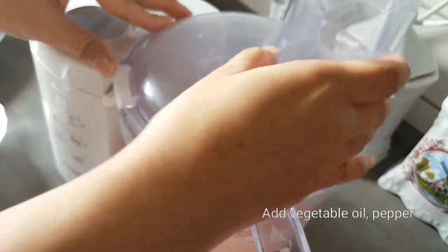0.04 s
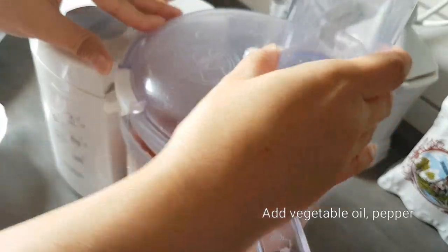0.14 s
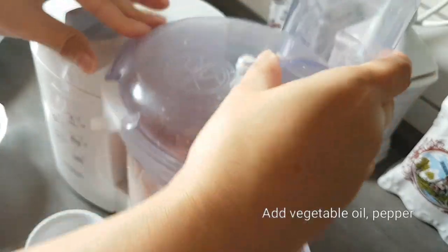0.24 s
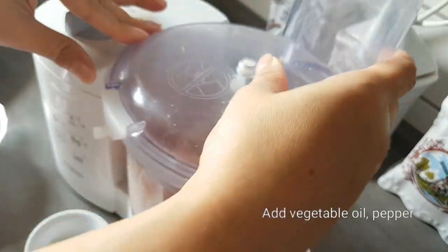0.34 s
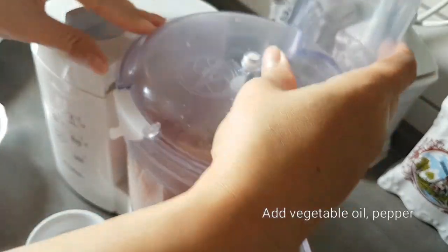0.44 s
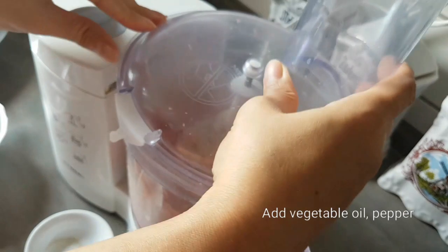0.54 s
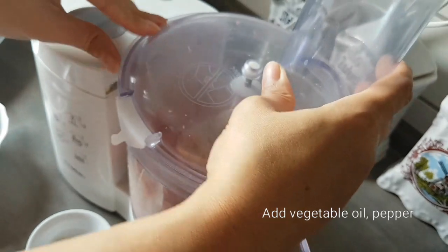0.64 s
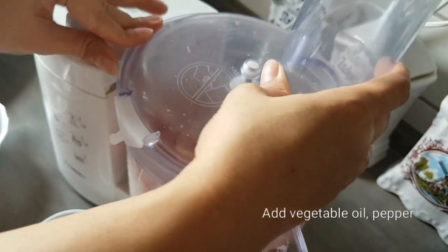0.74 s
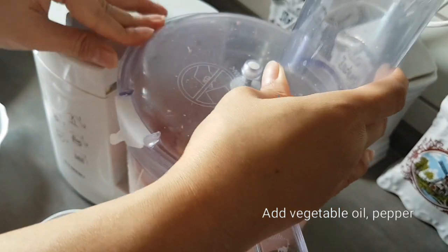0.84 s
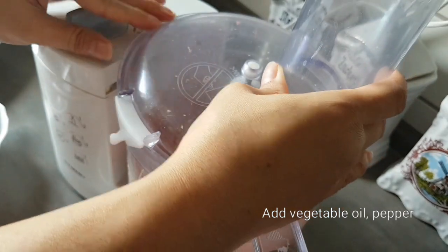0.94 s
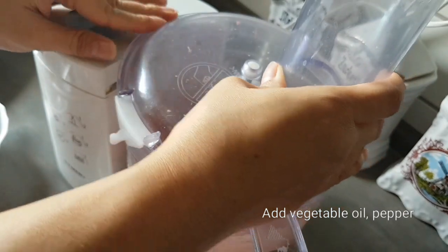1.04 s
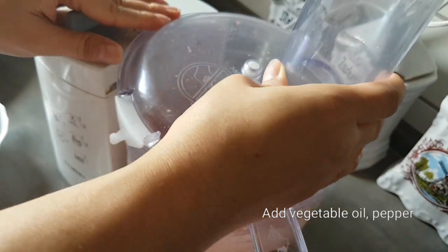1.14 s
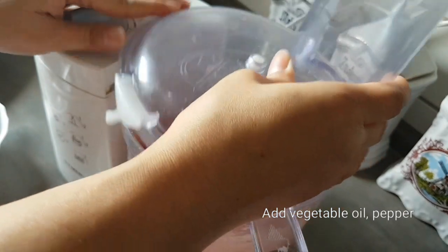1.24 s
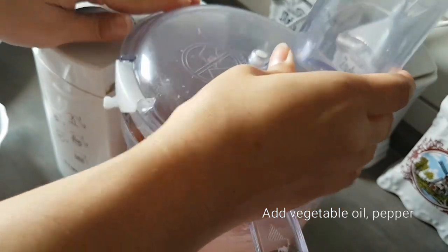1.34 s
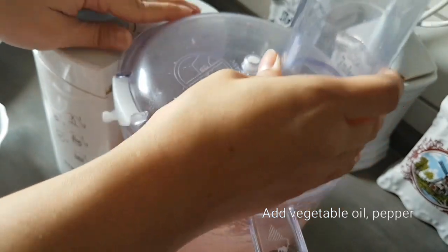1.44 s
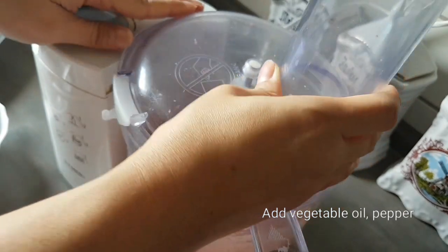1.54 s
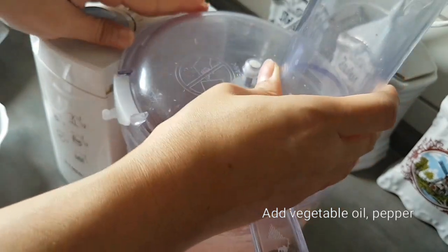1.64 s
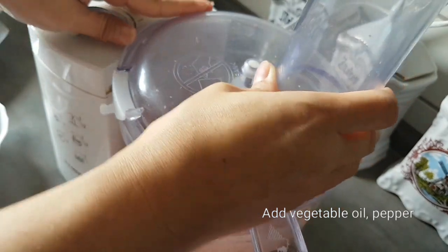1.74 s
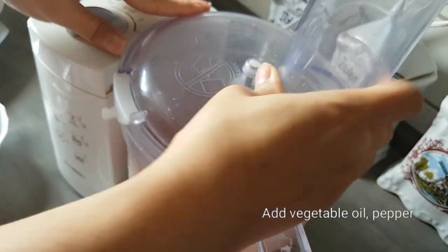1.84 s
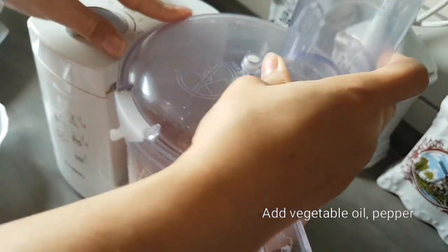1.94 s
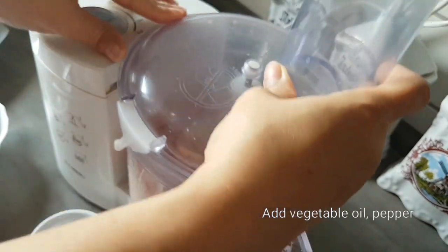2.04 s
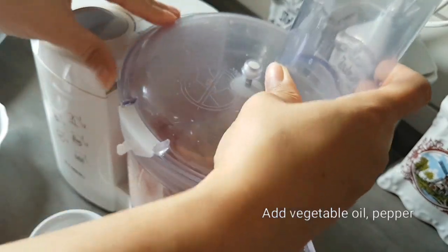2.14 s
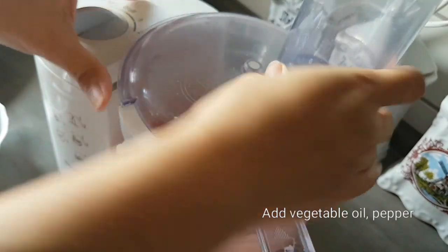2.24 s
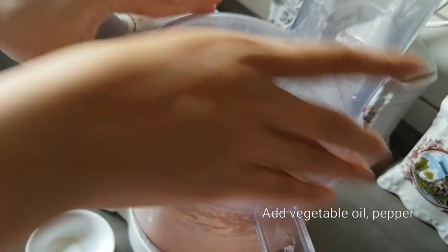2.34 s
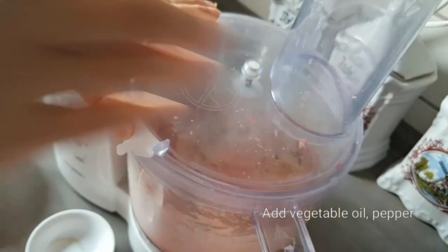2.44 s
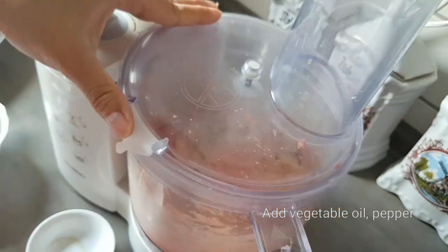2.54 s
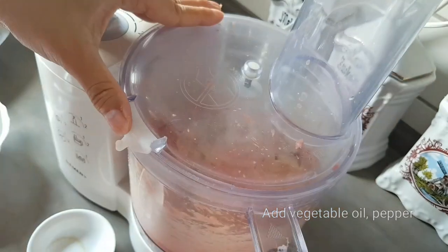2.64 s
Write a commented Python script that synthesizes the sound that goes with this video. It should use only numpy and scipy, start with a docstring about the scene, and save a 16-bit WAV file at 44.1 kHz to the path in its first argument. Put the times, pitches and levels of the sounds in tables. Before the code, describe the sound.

Hollow plastic knocks and short rubs as a lid is seated on a food processor bowl

```python
"""Hands turn and seat a plastic lid on a food processor bowl in a quiet kitchen, close to a stereo microphone pair.
A faint knock, then a sharp one at 0.24 s; lid rim rubs and scattered knocks follow up to 1.3 s.
Hard knocks cluster at 1.5-1.85 s; scrapes, one more firm knock at 2.38 s and faint taps close the scene.
Each knock rings decaying modes of base, bowl and lid and adds a noise tick; rubs are trains of tiny random slips.
Quiet room tone runs throughout, and sparse reflections answer every sound."""
import sys
import numpy as np
from scipy import signal
from scipy.fft import rfft, irfft, next_fast_len
from scipy.io import wavfile
from scipy.ndimage import uniform_filter1d

SR = 44100
rng = np.random.default_rng(int(sys.argv[2]) if len(sys.argv) > 2 else 0)


def dump(signal):
    """Clip the signal to [-1, 1] and save it as 16-bit WAV at the path in sys.argv[1]."""
    limited = np.clip(np.atleast_2d(signal).T, -1, 1)
    pcm = np.round(limited * 32767).astype(np.int16)
    wavfile.write(sys.argv[1], SR, pcm)


N = 119070

# Modes of base, bowl air, dome, rim, latch and tab, one list per part.
# Each row: frequency in Hz, level in dB, t60 in s before any damping by the hand or grip.
PART_MODES = [
    [(74.5, -14.5, 0.72), (99.7, 0.5, 0.29), (150.5, 3.5, 0.13)],
    [(286.2, 1, 0.11)],
    [(401, -7.5, 0.18), (510, -17, 0.15), (555, 0, 0.06), (604, 1, 0.067), (687.3, -2.5, 0.05)],
    [(877, -3, 0.078), (992, -6.5, 0.2), (1044, 0, 0.051)],
    [(1339, 2.5, 0.032), (1819, 0.5, 0.033)],
    [(2006, 7.5, 0.014), (2310, -1.5, 0.023)],
]
# Left-right likeness of reflections and room tone. Each row: frequency in Hz, likeness 0-1.
SIDE_LIKENESS = [(150, .9), (2000, 0.)]


def amp(db):
    """Convert dB to an amplitude factor."""
    return 10 ** (np.asarray(db) / 20)


def evened(x):
    """Scale to an RMS of 1."""
    return x / np.sqrt(np.mean(x ** 2) + 1e-20)


def read(points, hz):
    """Interpolate a (Hz, value) table along log frequency."""
    f, value = np.transpose(points)
    return np.interp(np.log(hz + 1), np.log(f + 1), value)


def colour(points):
    """Minimum-phase filter taps of energy 1 for a spectrum in dB."""
    half = read(points, np.fft.rfftfreq(4096, 1 / SR)) * np.log(10) / 20
    full = np.r_[half, half[-2:0:-1]]
    phase = -signal.hilbert(full).imag
    taps = np.fft.ifft(np.exp(full + 1j * phase)).real[:2048]
    return taps / np.linalg.norm(taps)


def add(mix, start_s, sound):
    """Mix a sound in place at its start time, cut at the end of the mix."""
    part = mix[round(start_s * SR):][:len(sound)]
    part += sound[:len(part)]


def partly_alike(left, other, likeness):
    """Left and right spectra of equal power: the right blends the left with an independent one."""
    return np.array([left, likeness * left + np.sqrt(1 - likeness ** 2) * other])


def air():
    """Quiet room tone: steady coloured noise, its bass alike on both sides."""
    # Spectrum of the room tone. Each row: frequency in Hz, relative level in dB.
    tone_spectrum = [(24, -40.5), (40, -2), (280, -5.5), (1310, -19), (14000, -29), (15500, -41)]
    rms_db = -63.5
    hz = np.fft.rfftfreq(1024, 1 / SR)
    a, b, c, d = rng.standard_normal((N // 256 + 5, 513, 4)).T
    z = partly_alike(a + 1j * b, c + 1j * d, read(SIDE_LIKENESS, hz)[:, None])
    z = z * amp(read(tone_spectrum, hz)[:, None])
    return amp(rms_db) * evened(signal.istft(z, nperseg=1024, noverlap=768)[1][:, :N])


def kitchen(x):
    """Sparse reflections of random sign, each band dying at its own speed; the bass is alike on both sides."""
    # Decay of the room. Each row: frequency in Hz, t60 in s.
    decay = [(100, 0.18), (3000, 0.22), (12000, 0.09)]
    # Strength of the reflections. Each row: frequency in Hz, level in dB.
    wet_level = [(300, -10), (2000, -11), (5000, -5)]
    taps = np.zeros((2, SR // 2))
    at = np.arange(200, SR // 2 - 20, 20)
    at = at + rng.integers(0, 20, (2, len(at)))  # one reflection per 20 samples
    np.put_along_axis(taps, at, rng.choice([-1., 1.], at.shape), 1)
    hz, t, (a, b) = signal.stft(taps, SR, nperseg=256)
    fade = amp(-60 * t / read(decay, hz)[:, None])
    z = partly_alike(a, b, read(SIDE_LIKENESS, hz)[:, None])
    z = z * fade / np.linalg.norm(fade, axis=1, keepdims=True)
    norm = np.linalg.norm(signal.istft(z[0], SR, nperseg=256)[1])
    tail = signal.istft(z * amp(read(wet_level, hz)[:, None]), SR, nperseg=256)[1] / norm
    return signal.fftconvolve(x[None], tail, axes=1)[:, :N]


def rotating_reflections(near):
    """Three random kitchens fade into one another in regular turns, so that no single pattern colours the tails."""
    turn_s = .05
    turn = np.pi * np.arange(N) / SR / turn_s
    return sum(kitchen(near * np.cos(turn + k * np.pi / 3)) for k in range(3)) * np.sqrt(2 / 3)


def scrape():
    """Hand and rim rub along plastic: tiny slips hiss in the treble and stir the low modes."""
    # Rubs, each swelling and fading. Each row: start in s, length in s, hiss level in dB,
    # level of the rumble in the bowl in dB.
    rub_rows = [(0.26, 0.21, -50, -44), (0.477, 0.15, -44.5, -41.5), (0.647, 0.16, -51, -48),
                (0.746, 0.12, -60, -52.5), (0.906, 0.08, -55.5, -52), (1.02, 0.12, -61.5, -61.5),
                (1.22, 0.028, -64, -71), (1.938, 0.21, -67, -55), (1.993, 0.036, -65.5, -48),
                (2.047, 0.02, -53.5, -81), (2.106, 0.022, -53.5, -66), (2.118, 0.32, -52.5, -50),
                (2.427, 0.37, -74, -63), (2.554, 0.027, -60, -74)]
    # Spectrum of the hiss. Each row: frequency in Hz, relative level in dB.
    hiss_spectrum = [(470, -24.5), (800, 0.5), (1860, 0), (13200, -22), (14700, -20.5), (15500, -68)]
    swell_power = 0.59
    slips_per_s, slip_spread_db = 2900, 2.5
    clump_s, clump_db = .006, 4  # slips come in clumps
    grip = .5  # t60 factor: the grip shortens the stirred modes

    hiss_level, rumble_level = np.zeros((2, N))
    for start_s, length_s, hiss_db, rumble_db in rub_rows:
        phase = np.pi * np.arange(0, length_s, 1 / SR) / length_s
        swell = abs(np.sin(phase)) ** swell_power
        add(hiss_level, start_s, amp(hiss_db) * swell)
        add(rumble_level, start_s, amp(rumble_db) * swell)

    slips = amp(slip_spread_db * np.minimum(rng.exponential(1, (2, N)), 4))
    slips *= rng.random((2, N)) < slips_per_s / SR
    clumps = evened(uniform_filter1d(rng.standard_normal((2, N)), round(clump_s * SR)))
    slips *= rng.choice([-1., 1.], (2, N)) * amp(clump_db * clumps * [[.5], [1]])  # hiss clumps less

    t = np.arange(6000) / SR
    body = np.zeros(len(t))
    for modes in PART_MODES:
        for hz, db, t60_s in modes:
            stir_db = db - 13.6 * np.log2(hz / 300) ** 2  # favours modes near 300 Hz
            body += amp(stir_db - 60 * t / (grip * t60_s)) * np.sin(2 * np.pi * hz * t)
    body /= np.linalg.norm(body)

    hiss = signal.oaconvolve(evened(slips[0]) * hiss_level, colour(hiss_spectrum))[:N]
    rumble = signal.oaconvolve(evened(slips[1]) * rumble_level, body)[:N]
    return hiss + rumble


def knocks():
    """Every blow rings all parts, each at its own strength, and ticks and rattles in the treble."""
    # Blows. Each row: start in s, tick level in dB, pitch of the held lid in Hz before detuning,
    # then ring level in dB of held lid, base, bowl air, dome, rim, latch, tab.
    blow_rows = [(0.0496, -42, 316, -63, -60, -60, -51, -53, -48, -45.5),
                 (0.2403, -22.5, 406, -32, -37, -27.5, -20.5, -27.5, -27.5, -15),
                 (0.2576, -45.5, 444.5, -8.5, -35, -15.5, -17.5, -50, -40, -35),
                 (0.375, -37.5, 316, -31, -65.5, -46.5, -30, -39, -62, -60),
                 (0.3856, -54, 398, -39.5, -73.5, -34.5, -37, -43.5, -38, -33.5),
                 (0.5324, -35.5, 355, -17, -53, -42, -24, -25.5, -41, -33),
                 (0.539, -31, 351, -32, -63.5, -46, -32.5, -35, -33, -33.5),
                 (0.5443, -29.5, 376.5, -31.5, -65.5, -50, -12.5, -22, -22.5, -28),
                 (0.5902, -42.5, 434, -26.5, -58, -53.5, -24.5, -54.5, -31, -45),
                 (0.6954, -48.5, 433, -27.5, -72.5, -42.5, -34, -39, -61, -34),
                 (0.7535, -35.5, 319, -30, -49.5, -43.5, -29, -33, -39.5, -40.5),
                 (0.7825, -41.5, 317, -36, -60, -41, -32, -41, -28.5, -28.5),
                 (0.8641, -54, 375, -30, -55, -36.5, -35.5, -51, -53, -39),
                 (0.9459, -46, 324, -27, -45, -35.5, -33.5, -49, -45, -64),
                 (0.9677, -45, 368, -34, -84.5, -31.5, -29, -36, -37.5, -35.5),
                 (1.0691, -52.5, 339, -52, -59, -55.5, -63, -50.5, -48, -52),
                 (1.0965, -53.5, 328, -46, -62, -54, -45, -55, -50, -63),
                 (1.2178, -58.5, 345.6, -47, -77, -35.5, -47, -57, -88, -78),
                 (1.534, -44, 338, -30, -56, -30.5, -40, -46, -50, -49),
                 (1.55, -33, 414, -29.5, -42, -31, -37, -36.5, -38.5, -38),
                 (1.6461, -27.5, 309.7, -21, -41.5, -68, -21.5, -18, -14.5, -23.5),
                 (1.7463, -32, 320.5, -27, -40, -25, -29, -37, -37.5, -42),
                 (1.83, -20.5, 323, -23.5, -32, -21, -23.5, -29.5, -32.5, -61),
                 (2.0209, -46, 323, -46.5, -56, -53, -52, -62, -55, -62),
                 (2.1043, -55, 309, -38.5, -58, -43, -42.5, -51, -54.5, -57),
                 (2.1249, -53, 333, -55, -46.5, -33.5, -44.5, -43.5, -44, -66),
                 (2.2153, -43, 337, -37.5, -41, -33, -42, -67, -50, -68),
                 (2.38, -37.5, 413, -26.5, -32, -16.5, -24.5, -35.5, -34, -23.5),
                 (2.5166, -56, 360, -55, -51.5, -57.5, -54.5, -48.5, -50.5, -71),
                 (2.642, -59, 303, -44, -55, -41, -44, -49, -46.5, -56)]
    # Build-up time constant of each ring in s, before contact time is added; parts in the order above.
    rise_s = [0.0022, 0.0046, 0.0018, 0.001256, 0.0013, 0.00021, 0.0001]
    # Spectrum of tick and rattle. Each row: frequency in Hz, relative level in dB.
    tick_spectrum = [(600, -33.5), (1500, 3.5), (2800, 3.5), (6830, -10.5), (13000, -24.5), (15500, -39)]
    lid_t60_s, damp_s = 0.16, 0.039  # the hand on the lid chokes its rings
    punch, punch_s = 0.87, 0.017  # the first moments ring louder
    min_spread_db, min_detune = 1.5, .006  # no two blows land alike
    square_db, stray_per_db = -20, .25  # weaker, glancing blows stray more
    contact_ref_s, soften = 0.001, 0.62  # the duller a blow against its ring, the longer the contact
    tick_t60_s, rattle_t60_s = .01, 0.084  # contact lengthens the tick
    rattle_db, snap_db = -6.5, -4.5

    t = np.arange(12000) / SR
    out, bright = np.zeros((2, N))
    luck = rng.standard_normal((len(blow_rows), 2, 7, 5))
    grit = rng.standard_normal((len(blow_rows), len(t)))
    for (start_s, tick_db, lid_hz, *ring_db), (miss, bend), noise in zip(blow_rows, luck, grit):
        dullness_db = max(ring_db[0], ring_db[3]) - tick_db
        contact_s = contact_ref_s * amp(soften * dullness_db)
        for p, modes in enumerate([[(lid_hz, 0, lid_t60_s)]] + PART_MODES):
            stray = 1
            if p in (3, 5, 6):  # dome, latch, tab
                stray += stray_per_db * np.clip(square_db - ring_db[p], 0, 20)
            ring = np.zeros(len(t))
            for k, (hz, db, t60_s) in enumerate(modes):
                mode_db = db + min_spread_db * np.sqrt(stray) * miss[p, k]
                mode_hz = hz * (1 + min_detune * stray * bend[p, k])
                ring += amp(mode_db - 60 * t / t60_s) * np.sin(2 * np.pi * mode_hz * t)
            envelope = 1 - np.exp(-t / (rise_s[p] + contact_s))
            envelope *= 1 + punch * np.exp(-t / punch_s)
            if p in (0, 2, 3):  # held lid, bowl air, dome
                envelope *= np.exp(-(t / damp_s) ** 2)
            add(out, start_s, amp(ring_db[p]) * envelope * ring)

        tick_fade = amp(-60 * t / (tick_t60_s + 10 * contact_s))
        rattle_fade = amp(rattle_db - 60 * t / rattle_t60_s)
        onset = 1 - np.exp(-(t / contact_s) ** 2)
        add(bright, start_s, amp(tick_db) * noise * onset * (tick_fade + rattle_fade))
        # hard blows crack up high
        snap = np.diff(noise[::-1], prepend=0) * t / contact_s * np.exp(-t / contact_s)
        add(out, start_s, amp(tick_db + snap_db) * contact_ref_s / contact_s * snap)
    return out + signal.oaconvolve(bright, colour(tick_spectrum))[:N]


def ports(x):
    """The two microphone ports hear the near sound with a phase and level offset."""
    # Phase offset. Each row: frequency in Hz, lead of the left in rad.
    left_lead = [(100, .35), (300, .75), (950, 1.), (1300, -.9), (2000, -1.6)]
    # Level offset. Each row: frequency in Hz, left minus right in dB.
    left_tilt = [(60, -2.5), (380, 1.5), (2380, -2.5), (15000, 0)]
    size = next_fast_len(N + 4096)
    hz = np.fft.rfftfreq(size, 1 / SR)
    half = amp(read(left_tilt, hz) / 2) * np.exp(.5j * read(left_lead, hz))
    return irfft(rfft(x, size) * np.array([half, 1 / half]), size)[:, :N]


def scene():
    """Lid and bowl near the microphone, the room around them."""
    near = knocks() + scrape()
    return ports(near) + rotating_reflections(near) + air()


def record(dry):
    """Bass roll-off of the microphone, then the band limit."""
    bass_cut_hz, edge_hz = 61.5, 14700
    high_pass = signal.butter(2, bass_cut_hz, "high", fs=SR, output="sos")
    thin = signal.sosfilt(high_pass, dry)
    low_pass = signal.firwin(511, edge_hz, window=("kaiser", 9), fs=SR)
    return signal.oaconvolve(thin, low_pass[None], "same")


dry = scene()
out = record(dry)
dump(out)
```